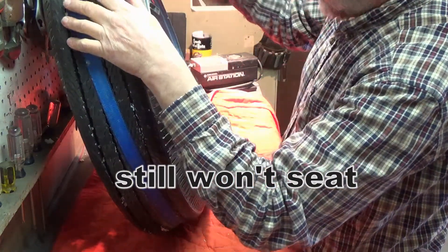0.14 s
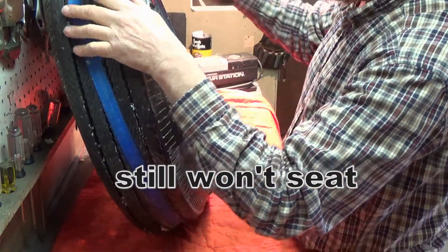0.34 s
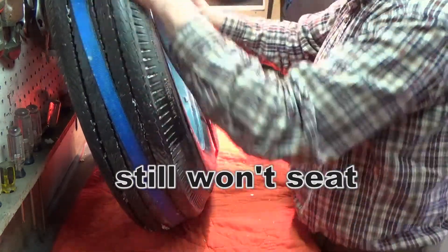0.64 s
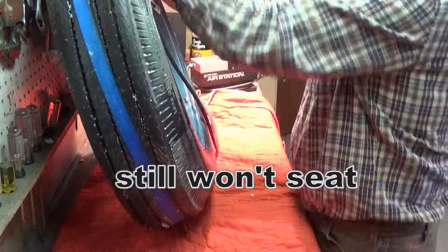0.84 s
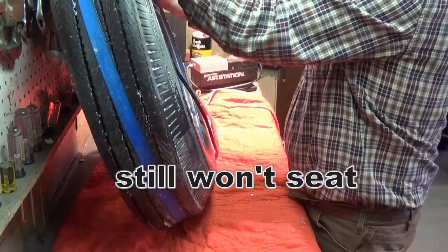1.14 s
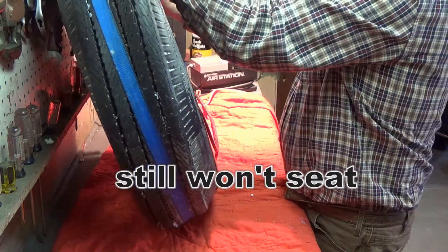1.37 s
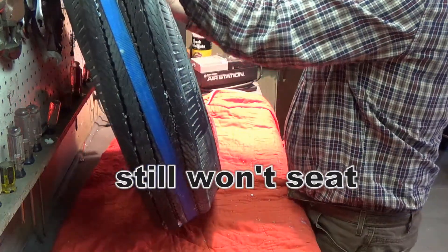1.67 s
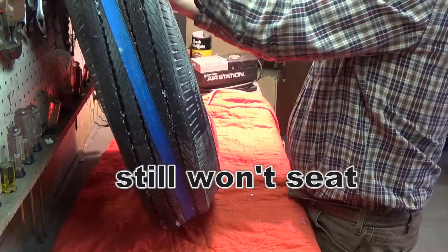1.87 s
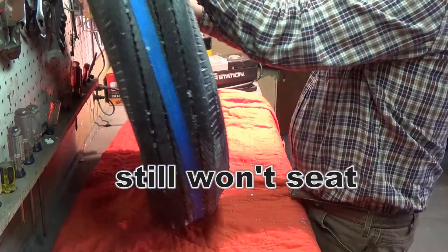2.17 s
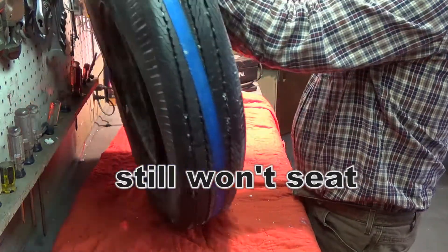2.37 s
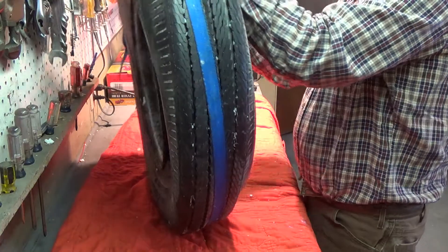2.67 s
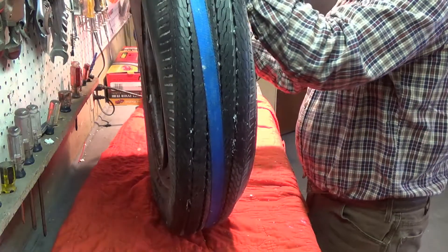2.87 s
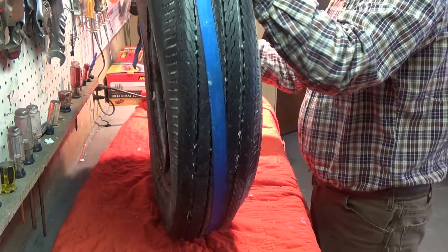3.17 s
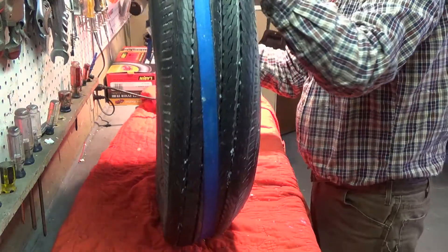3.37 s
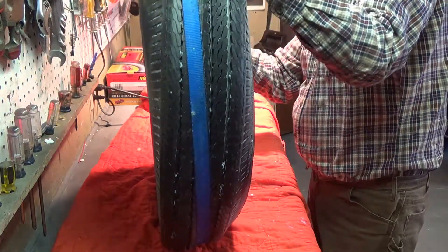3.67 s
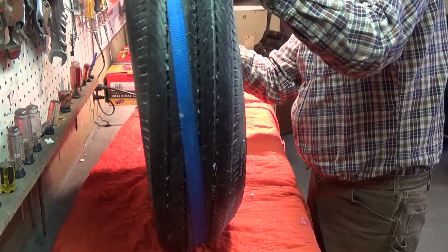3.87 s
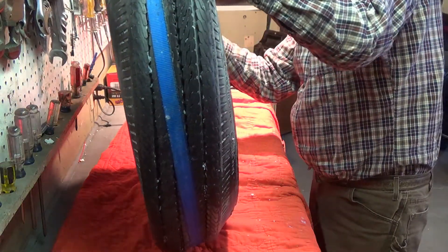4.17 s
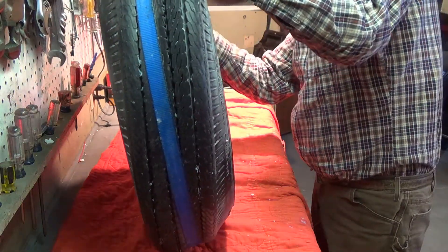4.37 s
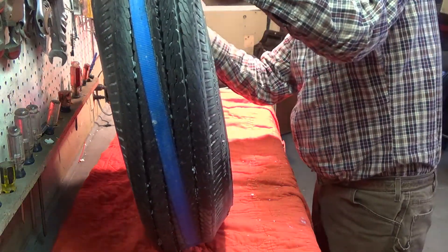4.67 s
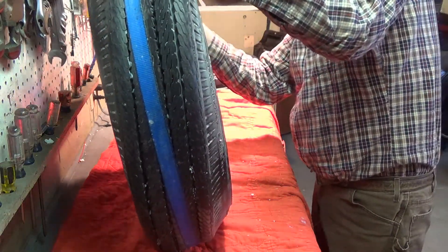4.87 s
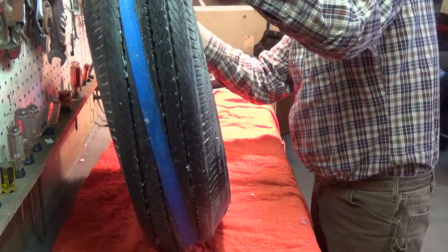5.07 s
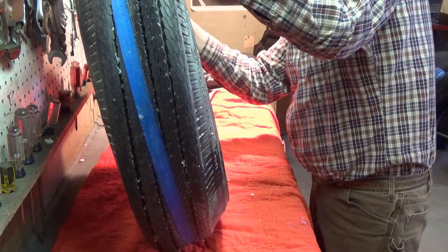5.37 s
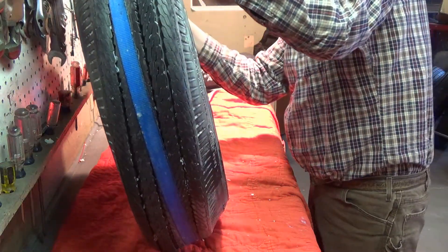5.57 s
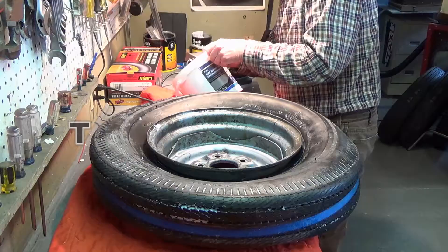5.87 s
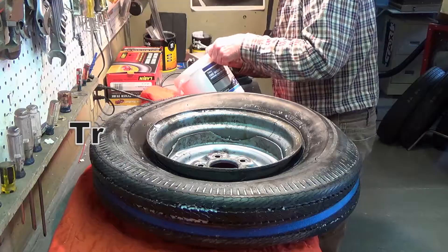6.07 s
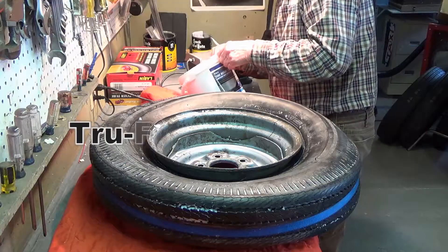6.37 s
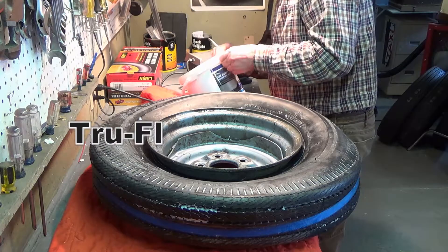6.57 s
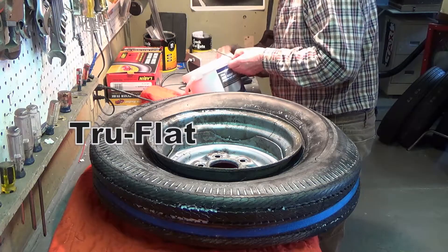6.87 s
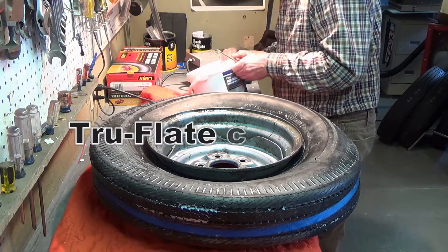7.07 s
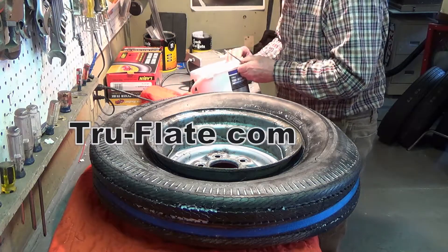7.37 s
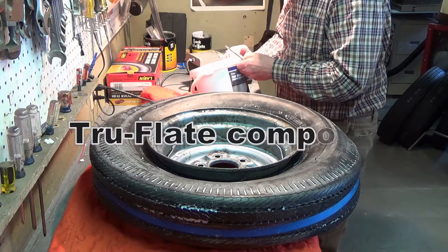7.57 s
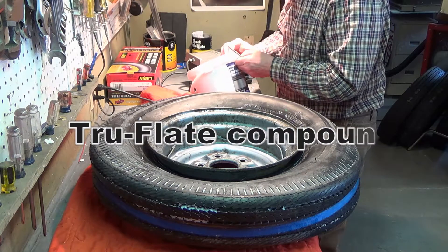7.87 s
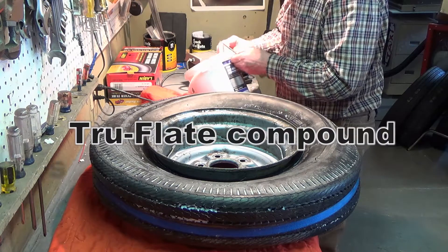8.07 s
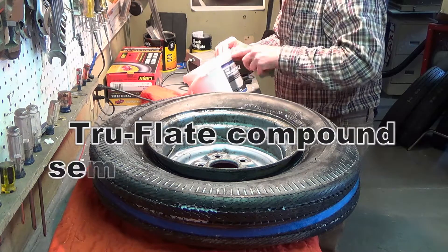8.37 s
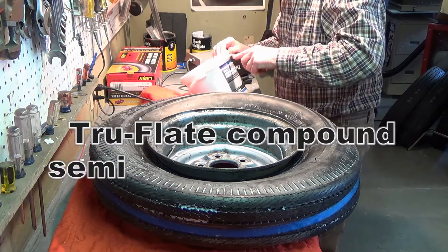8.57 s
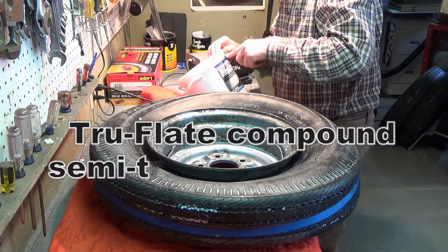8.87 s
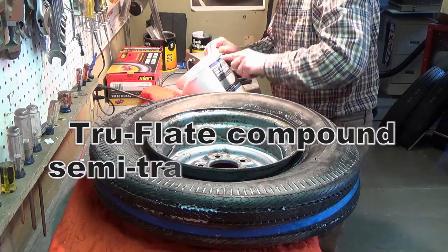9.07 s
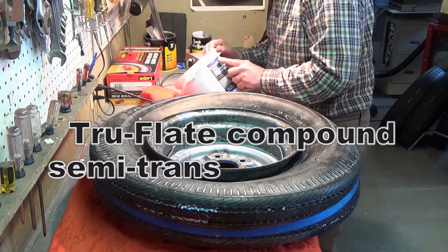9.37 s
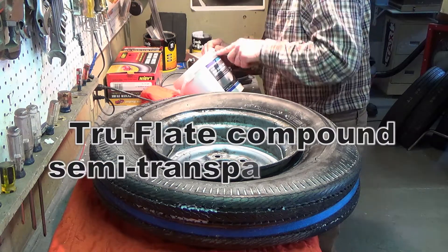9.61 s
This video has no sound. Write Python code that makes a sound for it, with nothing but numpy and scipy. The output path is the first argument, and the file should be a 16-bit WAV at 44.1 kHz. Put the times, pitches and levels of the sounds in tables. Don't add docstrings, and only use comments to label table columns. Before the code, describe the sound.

A small piston air compressor drones loudly with gear whine and clatter, cuts off abruptly, then a quiet garage with faint taps and a sharp lid crack.

```python
import sys
import numpy as np
from scipy import signal
from scipy.fft import rfft, irfft, next_fast_len
from scipy.io import wavfile
from scipy.ndimage import uniform_filter1d

SR = 44100
rng = np.random.default_rng(int(sys.argv[2]) if len(sys.argv) > 2 else 0)


def waveform_to_disk(signal):
    frames = np.transpose(np.atleast_2d(signal))
    scaled = np.clip(frames, -1, 1) * 32767
    samples = np.round(scaled).astype(np.int16)
    wavfile.write(sys.argv[1], SR, samples)


def rack_gain(trim_db):
    fader = np.asarray(trim_db, float)
    return 10 ** (fader / 20)


N = 429534
T = np.arange(N) / SR
HZ = np.fft.rfftfreq(next_fast_len(N), 1 / SR)

GEAR_TEETH, PINION_TEETH = 67, 8
MAINS_PULSE_HZ = 119.9

# (time [s], teeth meeting per second [Hz])
MESH_SPEED = [(0, 2539.5), (.6, 2540.5), (1.2, 2541), (1.8, 2538.5), (2.4, 2543), (3, 2544.5),
              (4.3, 2542.3), (5.9, 2543.5)]
MESH_ORDERS = (67, 132, 199, 269, 337)
# (level [dB], crank angle [turns], sharpness, share of opposed swell)
MESH_SWELLS = [(0.06, 0.52, 0.72, -0.81), (-12, 0.78, 1.2, 0.039), (-8.5, 0.49, 12., 0.063),
               (2, 0.64, 2.9, 0.39), (-0.5, 0.33, 8.1, 0.024)]
# (time [s], harshness)
TOOTH_CONTACT = [(0, -0.46), (.5, -1.8), (.67, -0.72), (.85, -1.5), (1.03, 0.76), (1.44, -0.2),
                 (1.55, -0.46), (2.03, 0.81), (2.16, 0.71), (2.47, -1), (2.75, 0.3), (3.5, 0.24),
                 (3.63, 0.25), (3.78, 0.41), (4.62, -0.062), (5.0, .4), (5.88, -0.17)]
# (level [dB], slope [dB per unit harshness])
FIRST_TONE = (-27.5, -2)
FOURTH_TONE = (-28, 1.5)
FIFTH_TONE = (-34, 5.3)
# (multiple of crank rate, level [dB])
CRANK_HARMONICS = [(1, -41), (2, -6.5), (3, -10), (4, -19.5), (5, -16.5), (6, -10), (7, -11), (8, 0),
                   (9, -4), (10, -8), (11, 0.5), (12, 1), (13, -7), (14, -4.5), (15, -11.5), (16, -1),
                   (17, -25), (18, -14.5), (19, -13), (20, -16), (21, -13), (22, -13.5), (23, -20),
                   (24, -16), (25, -30), (26, -60), (27, -32), (28, -25), (29, -29), (30, -24)]
CRANK_BLOWS = [(0.268, 0.86, 0.3), (0.344, 0.77, 0.51), (0.879, 1.0, 0.05), (0.954, 0.9, 0.2)]
# (frequency [Hz], level [dB per Hz])
CASING_SPECTRUM = [(25, -33), (75, -21), (178, -23), (300, -11), (430, -7.5), (620, -7.5), (977, -13),
                   (1700, -16), (2510, -6), (2790, -12.5), (4130, -15), (7000, -14), (10300, -9.5),
                   (15700, -21.5)]
# (frequency [Hz], width [Hz], level [dB])
CASING_RINGS = [(835, 81, 5.5), (1420, 240, 4), (2194, 340, 4), (2870, 230, 3.5), (3553, 400, 6),
                (4880, 720, 2.5), (5840, 50, 3.5), (7760, 910, 6), (10800, 2000, 3), (12800, 370, 7)]
# (frequency [Hz], side minus mid [dB])
PUMP_WIDTH = [(60, -32), (110, -9.5), (200, -9), (380, -8), (700, -2), (1290, -5.5), (2380, -8), (4400, -7),
              (8120, -12.5), (15000, -12.5)]
# (time [s], level [dB])
PUMP_END = [(5.896, 0), (5.899, -31), (5.919, -36), (5.924, -70)]

# (time [s], peak level [dB], frequency [Hz])
LID_CRACK = (7.6268, -3.5, 4300)
# (frequency [Hz], level [dB per Hz])
LID_RUSH = [(350, -44), (600, -39.5), (1090, -15.5), (1310, -24), (2810, -7), (3950, -8.5), (6120, -5),
            (7610, -14.5), (9090, -14), (13300, -24), (15700, -36)]
# (time [s], peak level [dB], colour [Hz], nail click re
# peak [dB], weight level [dB])
TAP_EVENTS = [(5.927, -45, 2580, -24, -44.5), (6.2397, -50, 9570, -7, -64), (6.2657, -46, 3190, -14, -62),
              (6.7012, -48, 3190, -11, -73), (7.0672, -33, 3420, -16, -67), (7.079, -29.5, 3700, -10, -57),
              (7.119, -40, 1590, -19, -52), (7.3194, -41.5, 3600, -14, -66), (8.1369, -52, 2900, -8, -68),
              (8.1618, -47, 3200, -12, -61), (8.659, -33.5, 2600, -13, -66), (8.865, -41.5, 1520, -11, -54),
              (9.109, -25, 3700, -9, -45), (9.1718, -32, 2870, -19, -45), (9.186, -34, 1530, -12, -37.5),
              (9.318, -40, 2810, -9, -46), (9.3294, -35.5, 3110, -6, -41), (9.5577, -49, 3200, -5, -63),
              (9.618, -32, 1200, -20, -39), (9.627, -38.5, 3200, -2, -40)]
# (frequency [Hz], level [dB], t60 [s])
TUB_MODES = [(684, 0, .09), (1530, -2, .06), (1860, -5, .07), (2070, -3, .09), (2480, -2, .09),
             (3330, -6, .08), (3600, -3, .06), (4100, -2, .06), (4720, -4, .06), (5320, -6, .07),
             (5990, -8, .06)]
# (frequency [Hz], level [dB], t60 [s])
HOLLOW_MODES = [(200, 8, 0.077), (258, 2.5, 0.17), (348, -1, 0.22), (421, 1.5, 0.12), (538, 7.5, 0.055),
                (687, 2, 0.11)]
# (frequency [Hz], level [dB], t60 [s])
BENCH_MODES = [(76, -2, .18), (92, 0, .15), (135, -5, .09)]
# (slip time [s], level [dB], colour [Hz], build-up [s])
RUB_EVENTS = [(7.081, -35.5, 3600, 0.046), (7.14, -44, 2100, .07), (7.21, -53, 2800, .02),
              (8.036, -50, 2650, 0.063), (8.172, -49, 3100, .06), (8.866, -46, 2050, 0.016),
              (9.19, -38, 2020, 0.043), (9.329, -47, 3400, .04), (9.44, -58, 3000, .1),
              (9.63, -35.5, 2600, 0.016), (9.68, -57, 2400, .05)]
# (time [s], level [dB])
BUMP_EVENTS = [(7.11, -51), (8.866, -57), (9.116, -44), (9.187, -50), (9.328, -37.5), (9.627, -43)]

# (frequency [Hz], level [dB per Hz])
AIR_SPECTRUM = [(15, -42), (25, 5), (185, -1.5), (242, 2), (301, -2), (714, -1.5), (2350, -5.5),
                (3160, -5.5), (3520, -6), (6920, -11), (11900, -10.5), (14000, -16), (16000, -9)]
# (frequency [Hz], side minus mid [dB])
AIR_WIDTH = [(60, -10), (110, -13), (200, -11), (380, -3), (700, -3.5), (1290, -0.5), (2380, -4),
             (4400, -5.5), (8120, -10), (15000, -8)]
# (frequency [Hz], level [dB])
HUM_TONES = [(118.4, -75), (242.2, -71.0), (360.7, -75.0), (479.1, -83.0), (721.4, -73.5), (839.8, -79),
             (958.2, -76.5), (15734, -72)]


def level(x, db):
    return x * rack_gain(db) / np.sqrt(np.mean(x ** 2))


def shape_db(points):
    hz, db = np.transpose(points)
    return np.interp(np.log(HZ + 1), np.log(hz), db)


def colour(x, db):
    size = next_fast_len(N)
    return irfft(rfft(x, size) * rack_gain(db), size)[:N]


def walk(rate):
    k = int(SR / rate)
    steps = np.repeat(rng.standard_normal(N // k + 1), k)
    return 0.78 * uniform_filter1d(uniform_filter1d(steps, k), k)[:N]


def echoes(x, t60):
    t = T[:int(SR * t60)]
    tail = rng.standard_normal(len(t)) * rack_gain(-60 * t / t60)
    return signal.fftconvolve(x, level(tail, 0) / np.sqrt(len(t)))[:N]


def ring(modes, t, detune):
    out = 0
    for (hz, db, t60), d in zip(modes, detune):
        out = out + rack_gain(db - 60 * t / t60) * np.sin(2 * np.pi * hz * (1 + d) * t)
    return out


def swell(turn, angle, sharp):
    return np.exp(sharp * (np.cos(2 * np.pi * (turn - angle)) - 1))


def compressor():
    mesh_hz = np.interp(T, *np.transpose(MESH_SPEED)) * (1 + 0.00021 * walk(24))
    turn = np.cumsum(mesh_hz / GEAR_TEETH / SR)
    motor = 2 * np.pi * turn * GEAR_TEETH / PINION_TEETH
    clatter_db = -26.5 - 0.1855 * T
    out = thumps(turn, motor) + gear_whine(turn, motor, clatter_db)
    out = out + casing_clatter(turn) * rack_gain(clatter_db)
    width_db = shape_db(PUMP_WIDTH)
    lead = np.imag(signal.hilbert(out, next_fast_len(N)))[:N]
    bass = colour(lead, width_db - 12 * (HZ / 700) ** 2)
    side = bass + colour(echoes(out, .4), width_db - 9 / (1 + (HZ / 600) ** 4))
    side = side - out * np.mean(side * out) / np.mean(out ** 2)
    return np.array([out + side, out - side]) * rack_gain(np.interp(T, *np.transpose(PUMP_END)))


def thumps(turn, motor):
    chug = stroke(turn) * rack_gain(-3.5 * swell(turn, .49, 3.5))
    valve = rack_gain(-7) * swell(turn, .74, 59.0) * np.sin(2 * np.pi * 25 * turn)
    motor_tone = rack_gain(-23.5) * np.sin(motor) + rack_gain(-25.0) * np.sin(2 * motor)
    return (level(chug, -0.24) + valve + motor_tone) * rack_gain(-25)


def stroke(turn):
    out = 0
    for k, db in CRANK_HARMONICS:
        blows = sum(size * np.exp(2j * np.pi * (ahead - k * angle)) for angle, size, ahead in CRANK_BLOWS)
        lead = np.angle(blows)
        if 4 < k < 10:
            lead -= 2 * np.pi * k * .3
        if k in (8, 9):
            db = db + 2.5
        elif k in (1, 3):
            db = db - 9
        loose = min(k / 9, 1.)
        gain = rack_gain(db + 1.2 * loose * walk(4.8))
        out = out + gain * np.cos(2 * np.pi * k * turn + lead + 0.3 * loose * walk(6.9))
    return out


def gear_whine(turn, motor, clatter_db):
    harsh = np.interp(T, *np.transpose(TOOTH_CONTACT))
    first_db, fourth_db, fifth_db = (db + slope * harsh for db, slope in (FIRST_TONE, FOURTH_TONE, FIFTH_TONE))
    fifth_db = fifth_db - 23 * np.clip((T - 2.2) / 0.92, 0, 1)
    heard = [first_db, clatter_db + 2 * harsh, clatter_db + 3, fourth_db, fifth_db]
    twist = 0.64 * (1 + 0.53 * walk(1.6)) * np.sin(2 * np.pi * (turn - .3))
    twist = twist + 0.24 * np.sin(6 * np.pi * turn)
    out = 0
    for order, (db, angle, sharp, share), heard_db in zip(MESH_ORDERS, MESH_SWELLS, heard):
        opposed = share * (1 + .2 * walk(2.496)) * swell(turn, angle - .43, sharp)
        load = swell(turn, angle, sharp) + opposed
        rock = 0.076 * np.sin(motor) + np.sqrt(order / GEAR_TEETH) * walk(16)
        tone = load * np.sin(2 * np.pi * order * turn + twist + rock)
        out = out + level(tone, db) * rack_gain(heard_db + 1.7 * walk(5.93))
    return out


def casing_clatter(turn):
    rings_db = sum(db / (1 + (2 * (HZ - hz) / width) ** 2) for hz, width, db in CASING_RINGS)
    torque = 1 + .14 * np.sin(2 * np.pi * MAINS_PULSE_HZ * T)
    drive = rack_gain(-5 * swell(turn, .52, 6.)) * torque
    rattle = clatter(turn, memory=0.45) * drive
    return level(colour(rattle, shape_db(CASING_SPECTRUM) + rings_db), 6.07)


def clatter(turn, memory):
    size = 1160
    noise = rng.standard_normal((int(turn[-1]) + 2, size))
    rows = signal.lfilter([1], [1, -np.clip(memory, 0, .95)], noise, axis=0)
    fine = signal.resample(rows.ravel(), 4 * rows.size)
    return np.interp(turn * 4 * size, np.arange(len(fine)), fine)


def lid():
    when, peak_db, hz = LID_CRACK
    after = np.maximum(T - when, 0)
    leak_db = -41 - 800 * np.maximum(7.624 - T, 0)
    burst_db = -23 - 300 * np.maximum(after - 0.042, 0)
    rush_db = np.where(T < when + .0008, leak_db, burst_db)
    treble_db = -11.5 + 22.5 * np.exp(-after / 0.058)
    jolt_db = rush_db - 15.5 - 7 * np.exp(-after / .012)
    rush = level(np.array([colour(v, shape_db(LID_RUSH)) for v in rng.standard_normal((2, N))]), 0)
    treble = signal.sosfiltfilt(signal.butter(3, 7500, "high", fs=SR, output="sos"), rush)
    rush = rush + (rack_gain(treble_db) - 1) * treble
    rush = rush[0] + 0.44 * rush[1] * np.array([[1], [-1]])
    jolt = level(colour(rng.standard_normal(N), -4 * np.abs(np.log2((HZ + 1) / 100)) ** 0.92), 0)
    crack = -rack_gain(peak_db) * np.exp(-((T - when) / .00016) ** 2) * np.sin(2 * np.pi * hz * (T - when))
    return rush * rack_gain(rush_db) + jolt * rack_gain(jolt_db) + crack


def taps():
    out, t = np.zeros(N + SR), T[:SR // 3]
    bright = signal.butter(1, [4500, 11500], "band", fs=SR)
    for s, peak_db, hz, click_db, weight_db in TAP_EVENTS:
        band = signal.butter(2, [hz / 1.5, min(hz * 1.5, 18000)], "band", fs=SR)
        noise = rng.standard_normal(len(t))
        near = [(f, db - 10 * abs(np.log2(f / hz)), t60) for f, db, t60 in TUB_MODES]
        walls = ring(near, t, .012 * rng.standard_normal(len(TUB_MODES)))
        hollow = ring(HOLLOW_MODES, t, 0.07 * rng.standard_normal(len(HOLLOW_MODES)))
        bench = ring(BENCH_MODES, t, .04 * rng.standard_normal(len(BENCH_MODES)))
        tap = rack_gain(peak_db - 7.5) * signal.lfilter(*band, noise) * rack_gain(-60 * t / 0.08)
        tap += rack_gain(peak_db - 9.5) * walls
        tap += rack_gain(peak_db + click_db + 7.5) * signal.lfilter(*bright, noise) * rack_gain(-60 * t / 0.049)
        tap += rack_gain(weight_db - 5.0) * hollow * (1 - np.exp(-t / 0.0023))
        tap += rack_gain(weight_db - 1.5) * bench * (1 - np.exp(-t / .007))
        out[int(s * SR):int(s * SR) + len(t)] += tap
    return out[:N]


def rubs():
    strength = np.repeat(rng.exponential(size=N // 40 + 1), 40)[:N]
    grain = rng.standard_normal(N) * rack_gain(1.8 * strength)
    centres = 1200 * 2 ** np.arange(0, 3.6, .5)
    bands = [level(colour(grain, -6 * np.log2((HZ + 1) / c) ** 2 / .0625), 0) for c in centres]
    out = np.zeros(N)
    for s, db, hz, build_s in RUB_EVENTS:
        octaves = np.log2(centres / hz)
        fade_db = np.where(T < s, 23 * (s - T) / build_s, 600 * (T - s))
        skirt_db = np.where(octaves < 0, 16 * octaves, np.maximum(-14 * octaves, -16))
        out += rack_gain(db - fade_db - 7.5) * sum(b * rack_gain(g) for b, g in zip(bands, skirt_db))
    return out


def bumps():
    out, t = np.zeros(N + SR), T[:SR // 2]
    detunes = 0.035 * rng.standard_normal((len(BUMP_EVENTS), len(BENCH_MODES)))
    for (s, db), detune in zip(BUMP_EVENTS, detunes):
        thump = ring(BENCH_MODES, t, detune) * (1 - np.exp(-t / .008))
        out[int(s * SR):int(s * SR) + len(t)] += rack_gain(db + 7.5) * thump
    return out[:N]


def garage():
    mid = colour(rng.standard_normal(N) * rack_gain(0.43 * walk(3.6)), shape_db(AIR_SPECTRUM))
    side = colour(rng.standard_normal(N), shape_db(AIR_SPECTRUM) + shape_db(AIR_WIDTH))
    air = level(np.array([mid + side, mid - side]), -57)
    hum = 0
    for hz, db in HUM_TONES:
        hum = hum + np.sqrt(2) * rack_gain(db + walk(14)) * np.sin(2 * np.pi * (hz * T + rng.random()))
    frame = ((T - 6.0017) * 29.97 + .5) % 1 - .5
    tick = np.exp(-(frame / 0.065) ** 2) * np.sin(2 * np.pi * 3190 / 30.1 * frame) * rack_gain(1.5 * walk(32))
    lamp = np.exp(1.5 * np.cos(2 * np.pi * MAINS_PULSE_HZ * T))
    hiss = level(colour(rng.standard_normal(N), -6 * ((HZ - 11950) / 250) ** 2), 0)
    whistle = np.sin(2 * np.pi * 11999 * T) + 1.3 * hiss
    return air + hum + level(tick, -67) + level(lamp * whistle, -68.0)


def scene():
    hands = taps() + rubs() + bumps()
    walls = np.array([echoes(hands, 0.25) for _ in range(2)])
    return compressor() + lid() + hands + rack_gain(-9.5) * walls + garage()


def band_limit(x):
    return signal.sosfilt(signal.butter(12, 16750, fs=SR, output="sos"), x)


def record(dry):
    top_cut_db = -300 * np.clip((HZ - 15850) / 600, 0, 1)
    mix = np.array([colour(v, top_cut_db) for v in dry])
    return band_limit(mix)


dry = scene()
out = record(dry)
waveform_to_disk(out)
```